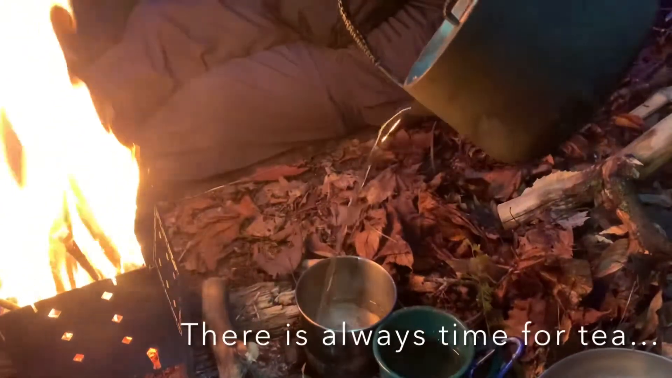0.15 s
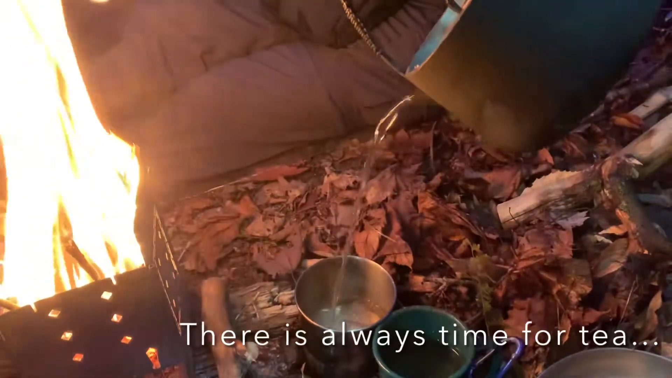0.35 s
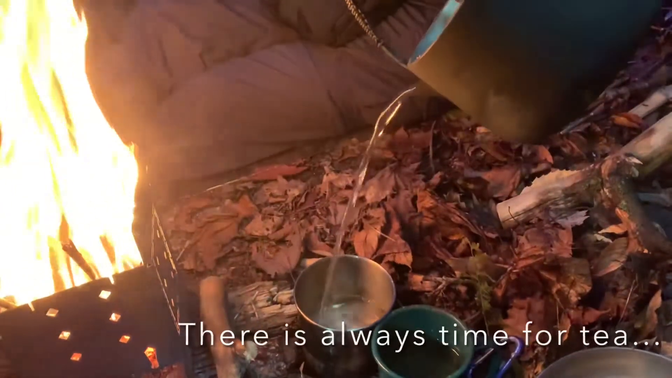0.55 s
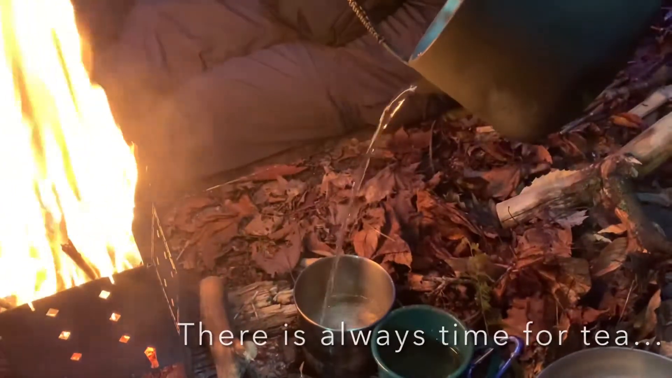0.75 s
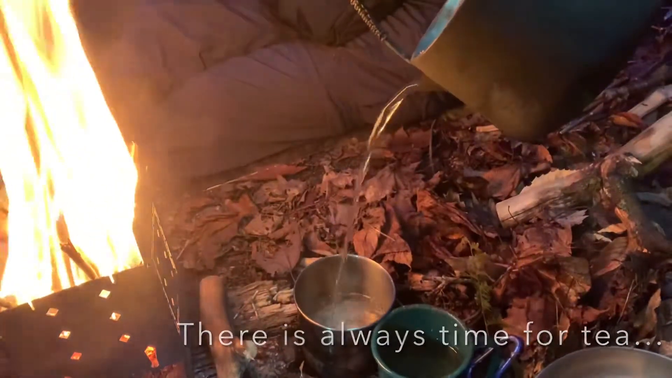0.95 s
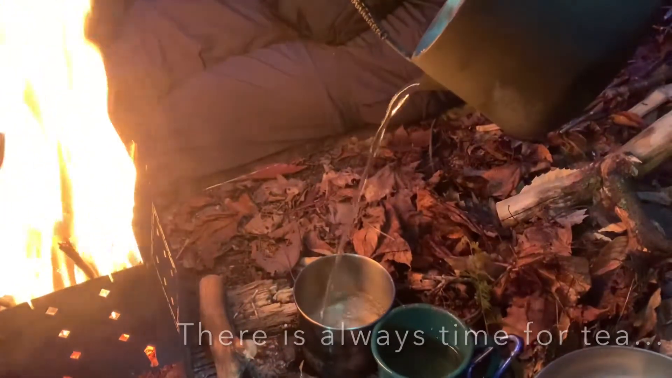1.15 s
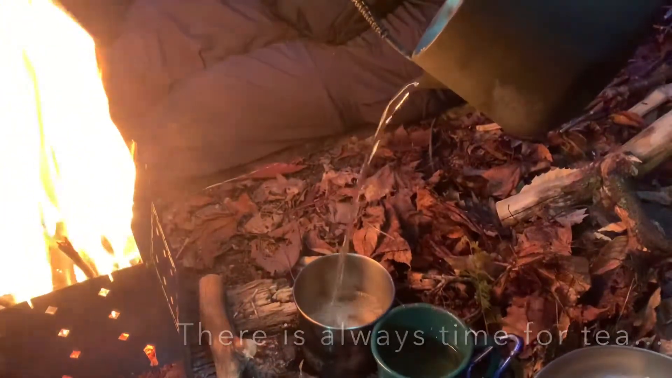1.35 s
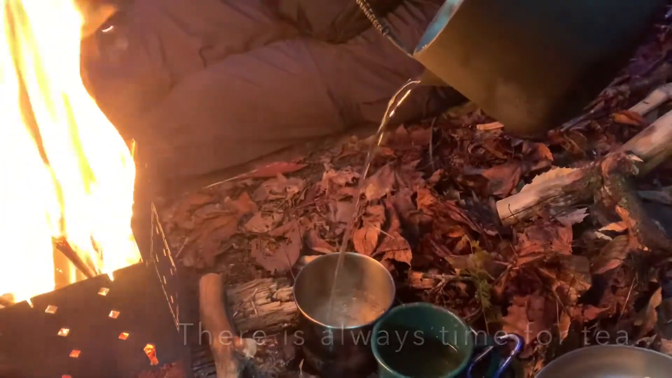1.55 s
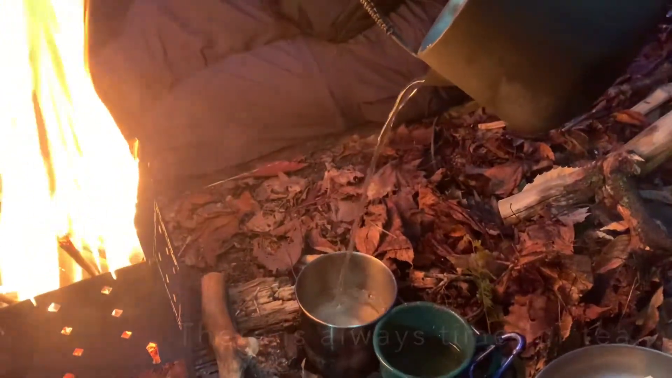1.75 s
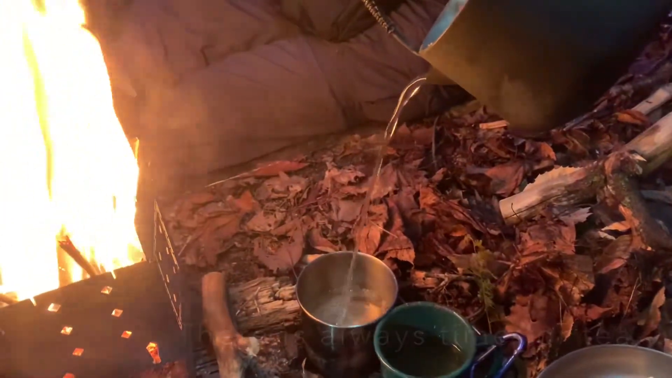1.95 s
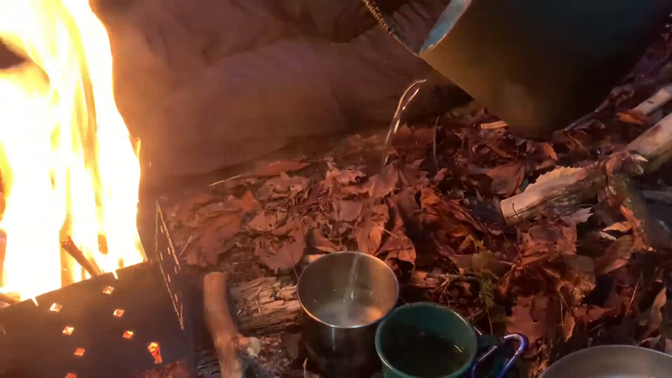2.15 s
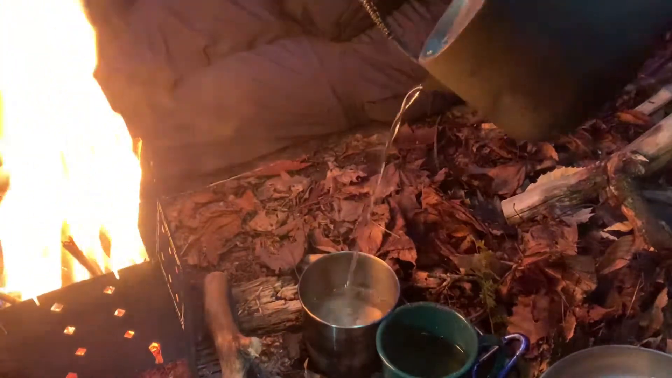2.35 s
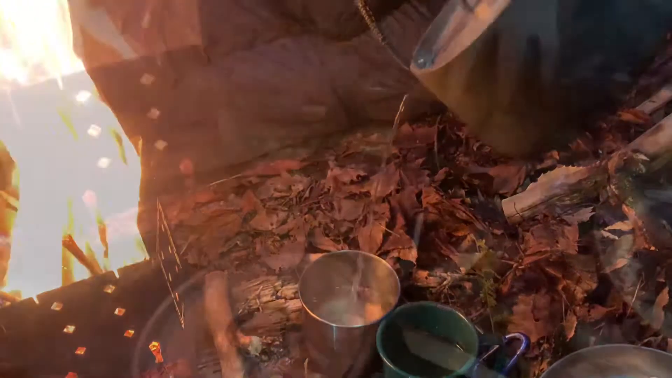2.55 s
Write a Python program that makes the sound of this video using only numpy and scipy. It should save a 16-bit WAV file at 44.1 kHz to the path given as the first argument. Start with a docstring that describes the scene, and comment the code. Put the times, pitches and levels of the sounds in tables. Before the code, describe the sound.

Thin stream of hot tea pouring into a metal mug, bubbling, beside a snapping campfire

```python
"""A thin stream of tea falls into a steel mug beside a campfire, heard close on two microphone ports outdoors.
Rising sine bubbles and spatter ring the mug's resonances; the pour fades away near the end.
Spray on the mug wall is filtered random impulses, with clusters of tiny bubbles; ticks are short noise and rings.
The fire's low flutter and its hiss are shaped noise; its snaps are impulses spread in time, treble first,
and two of them come with a puff of gas, a sine falling in pitch."""
import sys
import numpy as np
from scipy import signal
from scipy.fft import rfft, irfft, next_fast_len
from scipy.io import wavfile
from scipy.ndimage import map_coordinates

SR = 44100
rng = np.random.default_rng(int(sys.argv[2]) if len(sys.argv) > 2 else 0)


def int16_out(signal):
    """Quantize to a 16-bit WAV file."""
    q = np.round(np.clip(np.atleast_2d(signal).T, -1, 1) * 32767)
    wavfile.write(sys.argv[1], SR, q.astype(np.int16))


N = 119070  # samples, 2.7 s

# All levels are relative: mix gains, mug and port responses act on them later.
# clearest bubbles in the mug: start_s [s], level_db [dB], pitch_hz [Hz, before the rise]
PLOPS = [(0.016, -37, 1150), (0.081, -38, 1120), (.102, -40, 675), (.123, -41.5, 513), (.176, -38.5, 1030),
         (0.235, -33, 1090), (.239, -31.5, 2280), (.278, -29.5, 1015), (0.306, -33.5, 2440),
         (0.315, -34, 578), (0.349, -37, 1060), (0.447, -34, 2430), (0.467, -36.5, 1070),
         (.483, -37.5, 493), (.508, -45, 1070), (.537, -38, 510), (0.554, -43, 1080), (0.577, -34.5, 1040),
         (0.677, -35.5, 2400), (0.797, -30, 1045), (0.801, -34, 1600), (0.844, -34.5, 1350),
         (.875, -31.5, 1400), (0.878, -34, 2040), (0.918, -45, 1060), (.941, -33, 1083), (0.997, -38, 1230),
         (1.019, -41, 1110), (1.062, -37.5, 1115), (1.078, -29.5, 1073), (1.128, -35, 1075),
         (1.191, -34.5, 1050), (1.367, -29, 1102), (1.386, -33, 566), (1.406, -38.5, 1125),
         (1.422, -32.5, 944), (1.456, -35, 810), (1.4557, -38.5, 2580), (1.500, -31, 1270),
         (1.517, -28.5, 1077), (1.533, -34.5, 1074), (1.605, -42.5, 1160), (1.607, -35.5, 2500),
         (1.647, -44, 1080), (1.680, -32.5, 1050), (1.691, -29, 1060), (1.728, -41.5, 2420),
         (1.78, -32, 2650), (1.79, -30.5, 950), (1.839, -34.5, 1090), (1.88, -34, 736),
         (1.940, -36.5, 1230), (1.988, -31, 1064), (2.006, -35, 1095), (2.038, -35, 1120),
         (2.059, -29.5, 1066), (2.082, -31, 748), (2.095, -31.5, 1310), (2.121, -24.5, 2450),
         (2.277, -32.5, 1070), (2.2974, -23.5, 1270), (2.337, -35.5, 1130), (2.37, -31, 743),
         (2.404, -33, 1030), (2.475, -48, 1070), (2.520, -48, 820), (2.559, -50, 1080), (2.562, -41, 2450),
         (2.622, -42, 934), (2.651, -52, 965), (2.681, -44, 2390)]
# strength of the stream: time_s [s], level_db [dB]
POUR_LEVEL = [(0, 0.5), (.2, -4), (.32, 3), (.4, -2.5), (.54, -0.5), (.68, 1), (.78, -5.5), (.85, 0),
              (1.0, -1.5), (1.09, -1.5), (1.15, -4), (1.33, 0.5), (1.39, 2), (1.53, -3.5), (1.58, -7.5),
              (1.71, 1.5), (1.9, 0.5), (2.11, 4.5), (2.21, 0), (2.4, 1), (2.46, -15.5), (2.56, -8.5),
              (2.7, -31)]
# air resonances in the mug: pitch_hz [Hz], level_db [dB, before weighting by decay], t60_s [s]
MUG_MODES = [(488.2, 8, 0.077), (720, 1, 0.02), (1083, 3.5, 0.056), (1332, -1, 0.045), (1880, -22, 0.024),
             (2353, -4, 0.02), (4750, -15, 0.0068)]
# strength of the spray on the mug wall: time_s [s], level_db [dB]
SPRAY_LEVEL = [(0, -3.5), (.8, -3), (1.22, 2.5), (1.32, -7.5), (1.4, 1), (1.9, -1), (2.08, -2.5), (2.2, -7),
               (2.27, 1), (2.4, 0), (2.46, -7), (2.7, -21.5)]
# spectrum of the spray drops: frequency_hz [Hz], density_db [dB per Hz]
SPRAY_COLOUR = [(300, -4), (1500, -24), (2500, -19), (3600, 18), (5000, 18.5), (6500, 3.5), (8400, 17),
                (10500, 19), (15000, 4)]
# small sharp ticks of drops and embers: time_s [s], level_db [dB]
TICKS = [(.0197, -34), (0.048, -34.5), (.3064, -42), (0.318, -36.5), (.36, -39), (.396, -38),
         (0.4349, -30.5), (0.508, -33), (.604, -35), (0.615, -33.5), (0.797, -29.5), (0.9425, -28),
         (1.038, -41), (1.062, -36), (1.08, -48.5), (1.126, -36), (1.144, -38), (1.181, -30.5),
         (1.257, -31), (1.37, -36.5), (1.3864, -40.5), (1.457, -58), (1.5201, -30.5), (1.6038, -30.5),
         (1.646, -39), (1.665, -44), (1.6774, -32.5), (1.7624, -39), (1.78, -38), (1.823, -41.5),
         (1.8391, -33.5), (1.884, -36.5), (1.9144, -32.5), (1.9306, -35), (1.9615, -33), (2.0012, -33.5),
         (2.0324, -33.5), (2.1211, -26), (2.183, -38), (2.242, -39.5), (2.249, -29.5), (2.263, -31.5),
         (2.318, -51), (2.367, -40), (2.417, -31), (2.424, -22.5), (2.586, -42.5), (2.623, -47)]
# spectrum of the ticks: frequency_hz [Hz], density_db [dB per Hz]
TICK_COLOUR = [(300, -20), (1500, -35.5), (2450, 5), (3000, -7.5), (3800, 2.5), (5000, 7), (6500, -2.5),
               (8000, 5.5), (11000, 0.5), (15500, -5.5)]
# loud snaps of burning wood: time_s [s, before the lag along the log], level_db [dB],
# ring_db [dB, the ring against its crack]
SNAPS = [(0.6368, -6.5, -4), (1.2345, -9, -7.5), (1.2390, -9.5, -0.5), (2.4262, -7.5, -4.5)]
# spectrum of the snaps: frequency_hz [Hz], density_db [dB per Hz]
SNAP_COLOUR = [(100, -6), (1200, -7), (2400, -16.5), (3500, 0), (5000, 2.5), (7000, 4), (9500, 2),
               (13500, 1), (16000, 4.5)]
# puffs of gas from a snap: start_s [s], level_db [dB], decay_s [s]
PUFFS = [(0.6412, -36, 0.015), (2.4275, -17.5, 0.01)]
# strength of the flames' flutter: time_s [s], level_db [dB]
FLAME_LEVEL = [(0, -51), (.06, -52.5), (.28, -55), (.38, -49), (.5, -60.5), (.61, -44), (.7, -53.5),
               (.755, -41), (.83, -60.5), (.94, -43.5), (1.02, -58.5), (1.21, -50), (1.32, -56),
               (1.42, -47.5), (1.49, -53.5), (1.58, -48), (1.72, -52.5), (1.88, -52), (2.06, -49.5),
               (2.2, -56), (2.54, -59.5), (2.7, -65.5)]
# spectrum of the flutter: frequency_hz [Hz], density_db [dB per Hz]
FLAME_COLOUR = [(20, -25), (35, -12.5), (55, 1.5), (85, -0.5), (125, -6.5), (200, -16), (400, -26.5),
                (1000, -45), (3000, -51)]
# strength of the hiss of damp wood: time_s [s], level_db [dB]
HISS_LEVEL = [(0, 1), (.55, 0), (.75, -3), (1.4, -4.5), (2.0, 0.5), (2.41, -4), (2.46, -14.5), (2.7, -8.5)]
# spectrum of the hiss: frequency_hz [Hz], density_db [dB per Hz]
HISS_COLOUR = [(300, -20), (2000, -22), (3000, -15), (4000, -10), (5100, -20), (6500, -1), (9000, 6),
               (11000, 6), (13500, 12), (15500, -2.5)]
# phase between the ports for all port sounds but the snaps: frequency_hz [Hz], left_lag_rad [radians]
MUG_PHASE = [(0, 0), (1300, 0), (1700, -1.2), (2500, -2.3), (5100, -3.1), (6800, 0), (10150, 6.28),
             (13450, 12.57), (16750, 18.85)]
# phase between the ports for the snaps: frequency_hz [Hz], left_lag_rad [radians]
SNAP_PHASE = [(0, 0), (6800, -12.57), (10150, -6.28), (13450, 0), (16750, 6.28)]

# pour: spread is in log pitch, cycles is the decay time in periods, rise is a fraction of the pitch
PLOP_DB, PLOP_CYCLES, BLOW_DB = 2.5, 3.34, 26.5
SPLASH_DB, SPLASH_T60_S, SPLASH_BODY_DB = 25, 0.031, -32  # the spatter that follows each plop
BUBBLES_PER_S, BUBBLE_HZ, BUBBLE_SPREAD, BUBBLE_CYCLES, BUBBLE_RISE = 230, 992, 0.282, 2.35, 0.039
BUBBLE_ATTACK_CYCLES = 0.64
PINGS_PER_S, PING_HZ, PING_SPREAD, PING_CYCLES = 80, 2250, 0.12, 7.5  # smaller, brighter bubbles
BUBBLE_DB, MUG_DB, GURGLE_DB, PING_DB = -53, 3, -54, -66.5
MUG_WAVER_S, MUG_WAVER_PER_S = 0.000706, 16  # delay scale and knots a second
# spray
DROPS_PER_S, SPRAY_DB = 720, -55.5
FIZZ_PER_S, FIZZ_HZ, FIZZ_SPREAD, FIZZ_CYCLES, FIZZ_DB, CLUSTER_DB = 550, 6200, 0.26, 3.4, -60.5, 3.2
# ticks, snaps and puffs
TICK_DB, TICK_RING_HZ, TICK_RING_DB, TICK_RING_T60_S = 13.5, 5995, -3.5, 0.04
SNAP_DB, SNAP_RING_T60_S, SNAP_SCATTER_T60_S = 11.5, 0.013, 0.024
SNAP_LAG_S = 0.002017  # travel time of the log's bending wave at 1 kHz
PUFF_SWEEP_CYCLES, PUFF_END_HZ, PUFF_LEAD_S = 1.0, 1.7, 0.00022
# fire and recorder
FLAME_APART_DB, HISS_DB = -19, -52  # share of the flutter that differs between the ports; hiss level
TOP_HZ = 16300


def pour():
    """The stream traps bubbles in uneven bursts; each plop and its spatter ring the mug."""
    flow = level(POUR_LEVEL) * amp(0.61 * wobble(27.7))
    plops, blows, spatter = np.zeros((3, N))
    for start_s, level_db, pitch_hz in PLOPS:
        add(plops, start_s, amp(level_db + PLOP_DB) * bubble(pitch_hz, PLOP_CYCLES, rise=0.0096))
        add(blows, start_s, amp(level_db + BLOW_DB) * np.ones(1))
        add(spatter, start_s, amp(level_db + SPLASH_DB) * burst(SPLASH_T60_S))

    def body(hz):
        # band-pass around 1350 Hz, applied twice
        return (1j * hz * 1600 / (1350 ** 2 - hz ** 2 + 1j * hz * 1600)) ** 2
    splash = amp(SPLASH_BODY_DB) * filtered(spatter, body)
    small = swarm(BUBBLES_PER_S, BUBBLE_HZ, BUBBLE_SPREAD, BUBBLE_CYCLES, BUBBLE_RISE, size_db=5.0)
    small = unit(small + amp(MUG_DB) * mug(small))
    gurgle = unit(mug(impacts(rate=270, spread_db=8)))
    pings = swarm(PINGS_PER_S, PING_HZ, PING_SPREAD, PING_CYCLES, rise=0.012, size_db=7.5)
    stream = flow * (amp(BUBBLE_DB) * small + amp(PING_DB) * pings + amp(GURGLE_DB) * gurgle)
    return ports(plops + splash + mug(blows + spatter) + stream, scatter_db=1, t60=0.043)


def bubble(hz, cycles, rise):
    """A pocket of air that rings briefly and rises in pitch."""
    t = np.arange(SR // 20) / SR
    life = cycles / hz
    phase = hz * (t + rise * (t - life * (1 - np.exp(-t / life))))
    attack = 1 - np.exp(-t * hz / BUBBLE_ATTACK_CYCLES)
    return np.sin(2 * np.pi * phase) * np.exp(-t / life) * attack


def swarm(rate, centre_hz, spread, cycles, rise, size_db):
    """Bubbles of random time, size, pitch and life, scaled together to unit power."""
    x = np.zeros(N)
    for slot, (when, size, pitch, life) in enumerate(rng.standard_normal((2000, 4))):
        start_s = (slot + 2 * when) / rate
        if 0 < start_s < N / SR:
            hz = centre_hz * np.exp(spread * np.clip(pitch, -2, 2))
            sound = bubble(hz, cycles * np.exp(0.24 * life), rise)
            add(x, start_s, amp(size_db * min(size, 1.6)) * sound)
    return unit(x)


def mug(x):
    """The hollow of the mug rings with whatever happens in it; its pitches waver as the tea sloshes."""
    def response(f):
        total = 0
        for hz, db, t60 in MUG_MODES:
            width_hz = np.log(1000) / np.pi / t60
            gain = amp(db) * np.sqrt(t60 / MUG_MODES[0][2])
            total = total + gain * 1j * f * width_hz / (hz * hz - f * f + 1j * f * width_hz)
        return total
    waver = MUG_WAVER_S * SR * wobble(MUG_WAVER_PER_S)  # samples
    return map_coordinates(filtered(x, response), [np.arange(N) + waver], mode="mirror")


def spray():
    """Fine drops patter on the wall of the mug, and tiny bubbles burst in clusters."""
    patter = impacts(DROPS_PER_S, spread_db=8.5) * amp(3.0 * wobble(21.83))
    drops = unit(coloured(patter, SPRAY_COLOUR))
    fizz = swarm(FIZZ_PER_S, FIZZ_HZ, FIZZ_SPREAD, FIZZ_CYCLES, rise=0, size_db=5.5)
    fizz = unit(fizz * amp(CLUSTER_DB * wobble(29.85)))
    drops = amp(SPRAY_DB) * ports(drops, scatter_db=-33.0, t60=0.0067)
    fizz = amp(FIZZ_DB) * ports(fizz, scatter_db=3.5, t60=0.078)
    return level(SPRAY_LEVEL) * (drops + fizz)


def ticks():
    """Single drops and embers that stand out, each a noise burst with its own brief ring of six tones."""
    x, t = np.zeros(N), np.arange(SR // 20) / SR
    for time_s, level_db in TICKS:
        hz = TICK_RING_HZ * np.exp(0.45 * np.clip(rng.standard_normal((6, 1)), -2, 2))
        tones = np.sin(2 * np.pi * hz * t).sum(0)
        ring = unit_energy(tones * amp(-60 * t / TICK_RING_T60_S))
        sound = burst(t60=0.0033) + amp(TICK_RING_DB) * ring
        add(x, time_s - .0004, amp(level_db + TICK_DB) * sound)
    return ports(coloured(x, TICK_COLOUR), scatter_db=-4.5, t60=0.029)


def snaps():
    """Wood splits: a crack runs along the log, treble first, and rings; escaping gas puffs, falling in pitch."""
    cracks, puffs = np.zeros((2, N))
    for time_s, level_db, ring_db in SNAPS:
        add(cracks, time_s, amp(level_db + SNAP_DB) * np.ones(1))
        add(cracks, time_s, amp(level_db + SNAP_DB + ring_db) * burst(SNAP_RING_T60_S))

    def bending_wave(hz):
        # the delay shrinks with the square root of frequency
        return np.exp(-4j * np.pi * SNAP_LAG_S * np.sqrt(1000 * hz))
    cracks = filtered(coloured(cracks, SNAP_COLOUR), bending_wave)
    t = np.arange(SR // 10) / SR
    phase = PUFF_SWEEP_CYCLES * np.log(1 + t / PUFF_LEAD_S) + PUFF_END_HZ * t
    for start_s, level_db, decay_s in PUFFS:
        envelope = np.exp(-(t / decay_s) ** 1.03) * (1 - np.exp(-t / 0.0027))
        add(puffs, start_s, amp(level_db) * np.sin(2 * np.pi * phase) * envelope)
    cracks = ports(cracks, scatter_db=-5.5, t60=SNAP_SCATTER_T60_S, phase=SNAP_PHASE)
    return cracks * amp([[-.6], [.6]]) + puffs  # cracks lean right, in dB


def fire():
    """Flames flutter low, nearly alike at both ports, while damp wood hisses."""
    shared, apart = coloured(rng.standard_normal((2, N)), FLAME_COLOUR)
    flutter = unit(shared) + amp(FLAME_APART_DB) * unit(apart) * np.array([[1], [-1]])
    flutter = flutter * level(FLAME_LEVEL) * amp(0.53 * wobble(16))
    hiss = unit(coloured(rng.standard_normal(N), HISS_COLOUR))
    hiss = hiss * level(HISS_LEVEL) * amp(HISS_DB + wobble(28.74))
    return flutter + ports(hiss, scatter_db=-41, t60=0.0093)


def ports(x, scatter_db, t60, phase=MUG_PHASE):
    """Both ports hear the direct sound, and scatter from cookware and ground that differs in the treble."""
    def lag(hz):
        return np.exp(.5j * np.interp(hz, *np.transpose(phase)) * np.array([[-1], [1]]))
    direct = filtered(x, lag)
    t = np.arange(SR // 20) / SR
    envelope = amp(-60 * t / t60) * (1 - np.exp(-t / 0.00053))
    tail = unit_energy(rng.standard_normal((2, len(t))) * envelope)
    scatter = signal.fftconvolve(x[None], tail, axes=1)[:, :N]
    scatter = filtered(scatter, lambda hz: (1j * hz + 250) / (1j * hz + 1800))  # less bass
    return direct + amp(scatter_db) * scatter


def burst(t60):
    """A short dying crack of noise with energy 1."""
    t = np.arange(SR // 20) / SR
    return unit_energy(rng.standard_normal(len(t)) * amp(-60 * t / t60))


def impacts(rate, spread_db):
    """Random impulses of uneven size and either sign, rate a second on average."""
    hits = rng.random(N) < rate / SR
    signs = rng.choice([-1, 1], N)
    return hits * signs * amp(spread_db * np.clip(rng.standard_normal(N), -2, 2))


def amp(db):
    """Gain from dB."""
    return 10 ** (np.asarray(db) / 20)


def unit(x):
    """Scale to mean power 1."""
    return x / np.sqrt(np.mean(x ** 2) + 1e-20)


def unit_energy(x):
    """Scale each channel to energy 1."""
    return x / np.sqrt(np.sum(x ** 2, axis=-1, keepdims=True) + 1e-20)


def along(points, hz):
    """Interpolate (Hz, value) points on a log axis."""
    f, v = np.transpose(points)
    return np.interp(np.log(hz + 1), np.log(f + 1), v)


def level(points):
    """Gain per sample from (s, dB) points."""
    return amp(np.interp(np.arange(N) / SR, *np.transpose(points)))


def wobble(rate):
    """A smooth random curve, rate knots a second."""
    return map_coordinates(rng.standard_normal(N // 100), [np.arange(N) * rate / SR], mode="mirror")


def add(track, s, sound):
    """Mix a sound into the track at a time in seconds."""
    part = track[..., max(0, round(s * SR)):][..., :sound.shape[-1]]
    part += sound[..., :part.shape[-1]]


def filtered(x, response):
    """Multiply the spectrum of x by a complex response of frequency."""
    m = 2 * next_fast_len(N // 2 + SR // 4)
    return irfft(rfft(x, m) * response(np.fft.rfftfreq(m, 1 / SR)), m)[..., :N]


def coloured(x, colour):
    """Causal minimum-phase filter of mean power 1 with the given spectrum."""
    def response(hz):
        # fold the cepstrum onto positive time
        c = irfft(np.log(unit(amp(along(colour, hz)))))
        c[1:len(c) // 2] *= 2
        c[len(c) // 2 + 1:] = 0
        return np.exp(rfft(c))
    return filtered(x, response)


def scene():
    """Mug and fire side by side; the pour and the flames lean slightly left, in dB."""
    leaning = (pour() + fire()) * amp([[.4], [-.4]])
    return leaning + spray() + ticks() + snaps()


def record(dry):
    """The recorder cuts steeply above its band limit."""
    return filtered(dry, lambda hz: 1 / (1 + (hz / TOP_HZ) ** 120))


dry = scene()
out = record(dry)
int16_out(out)
```